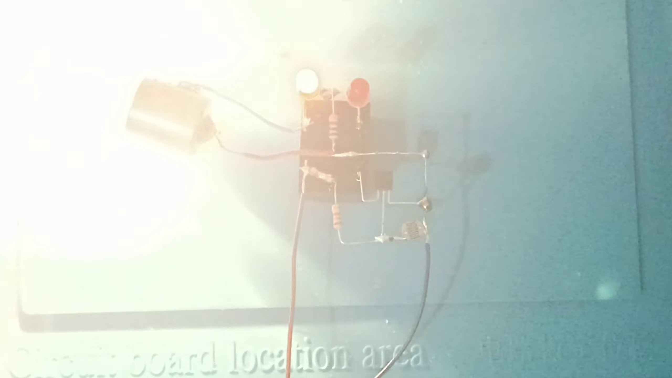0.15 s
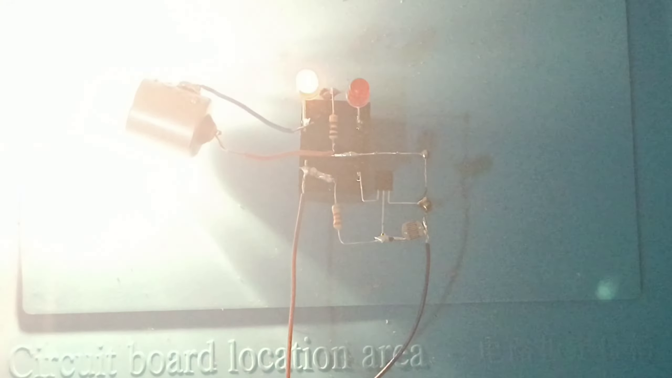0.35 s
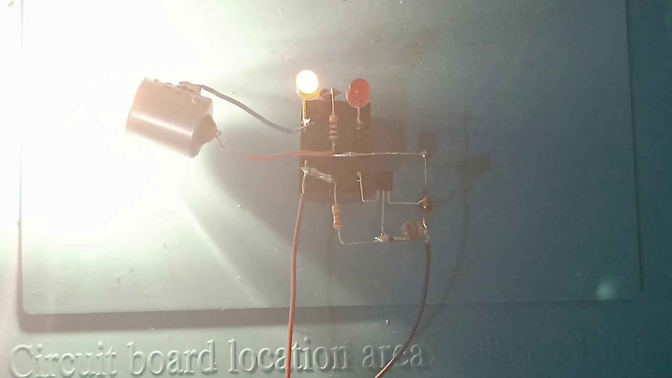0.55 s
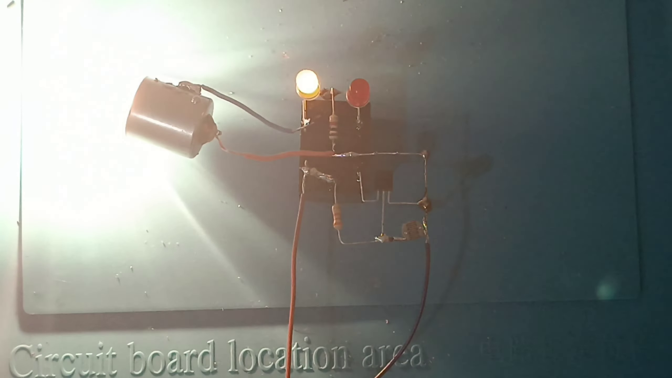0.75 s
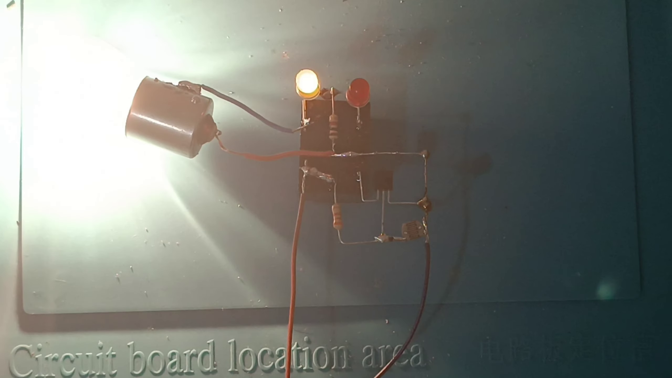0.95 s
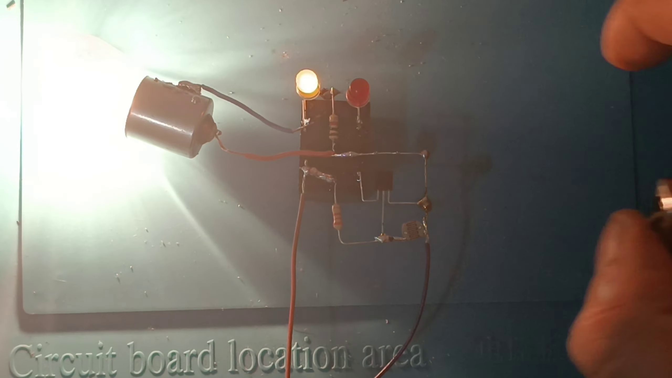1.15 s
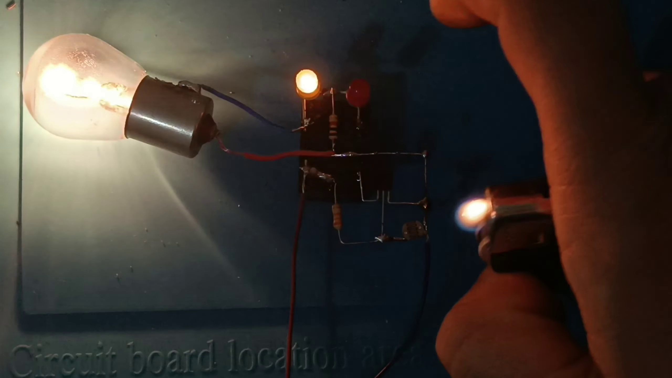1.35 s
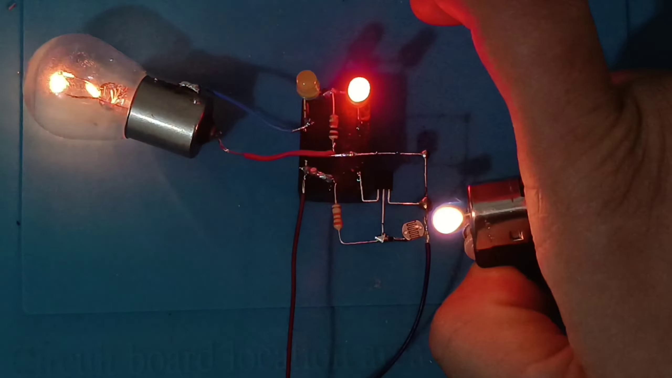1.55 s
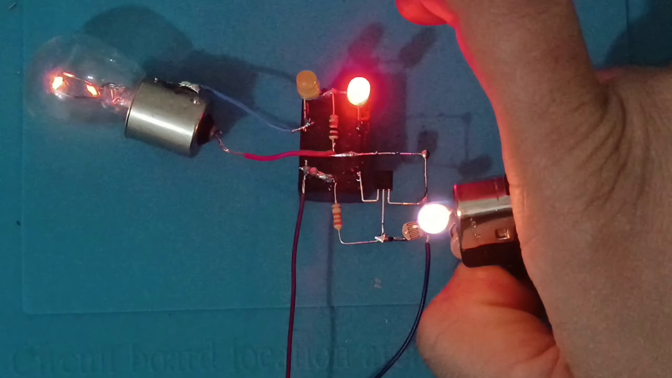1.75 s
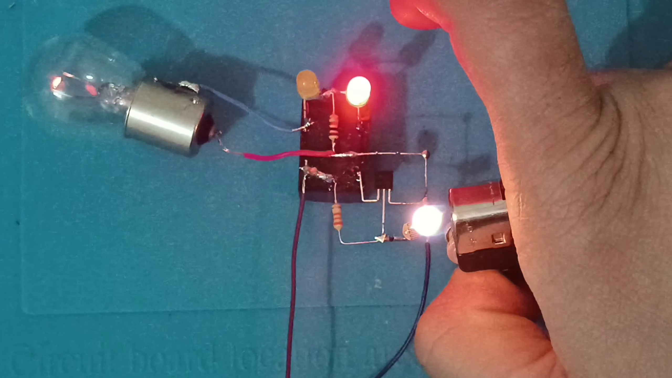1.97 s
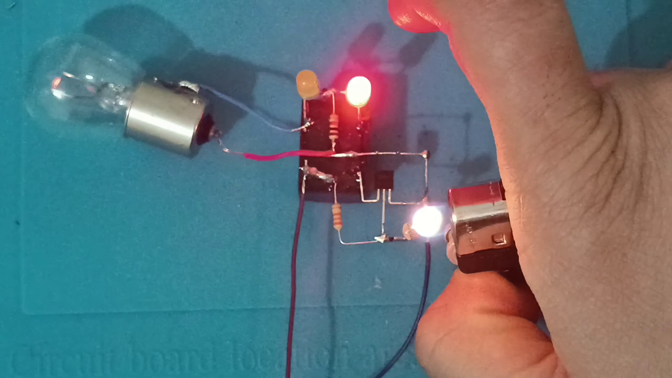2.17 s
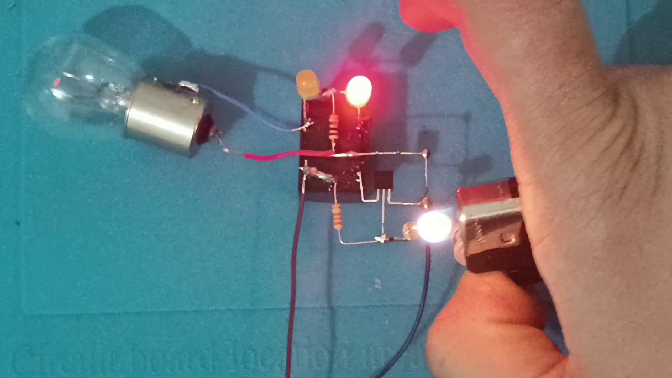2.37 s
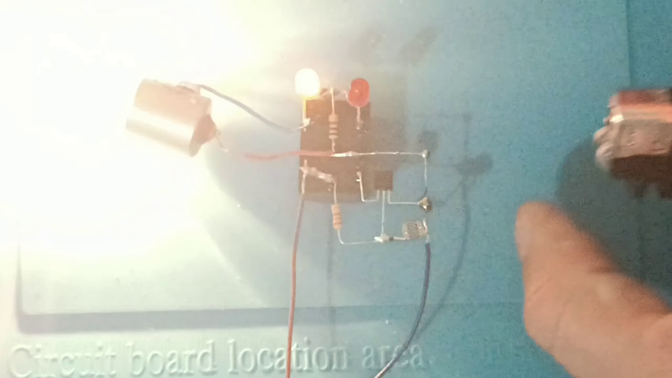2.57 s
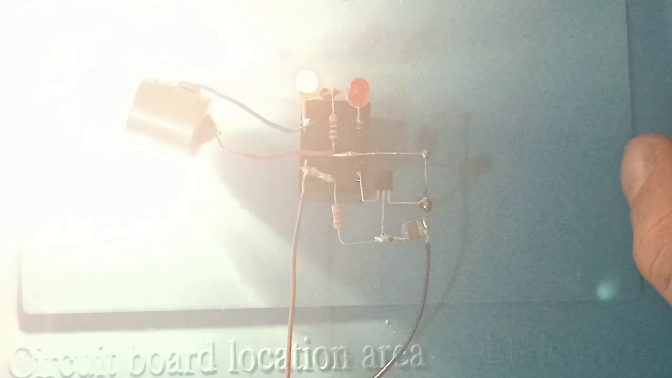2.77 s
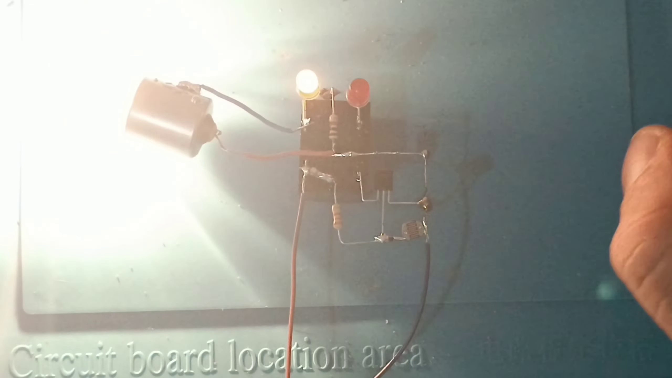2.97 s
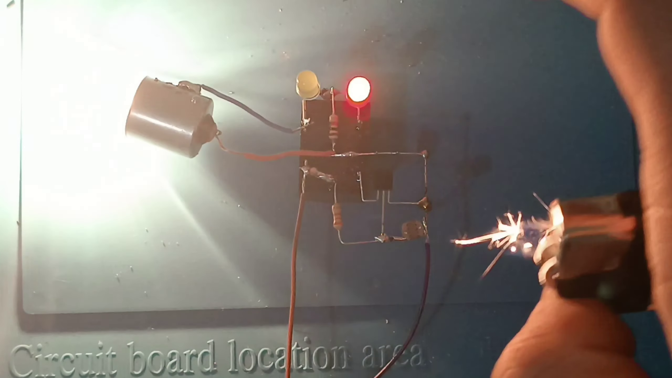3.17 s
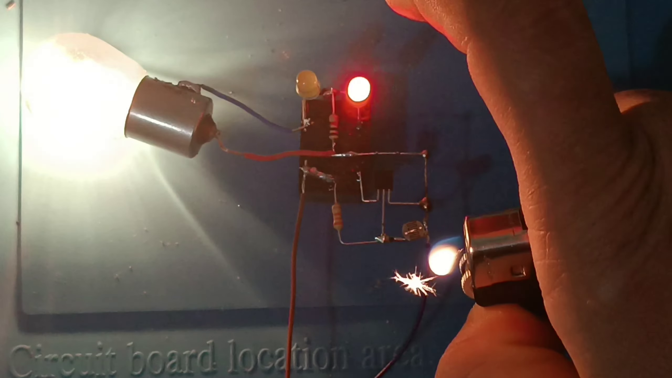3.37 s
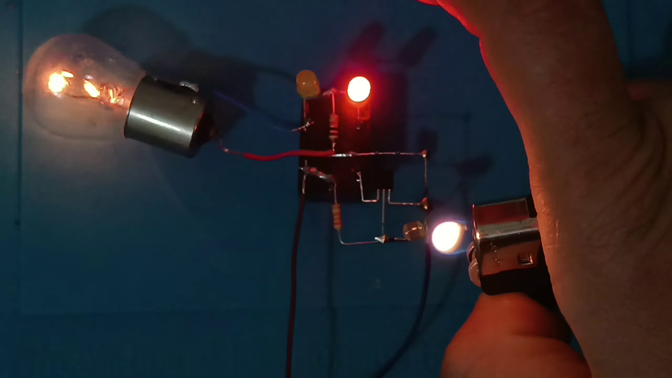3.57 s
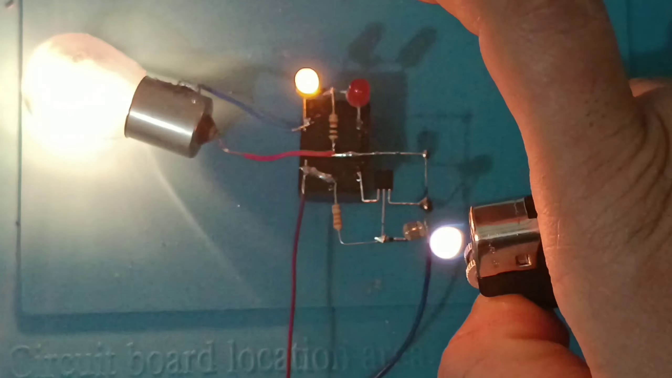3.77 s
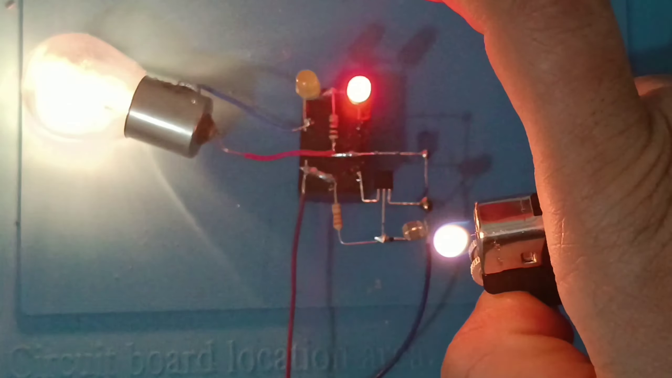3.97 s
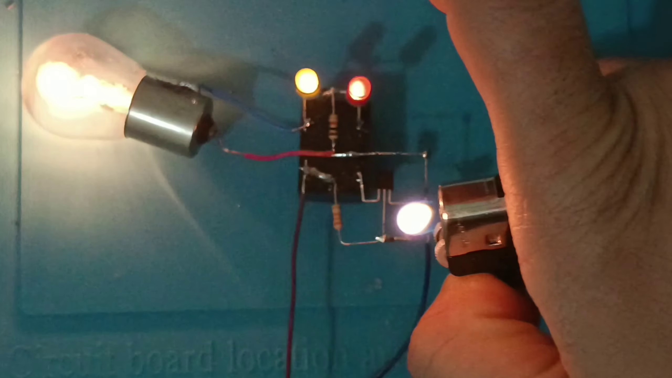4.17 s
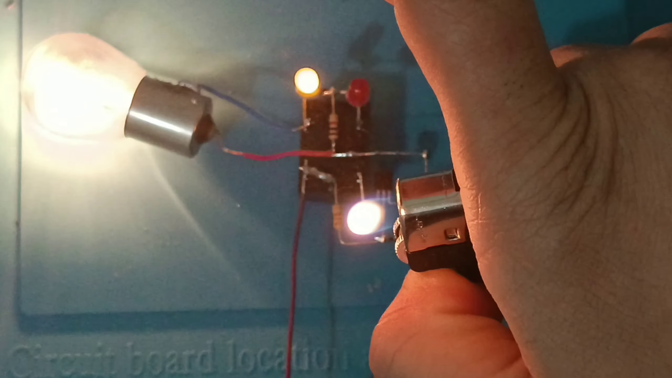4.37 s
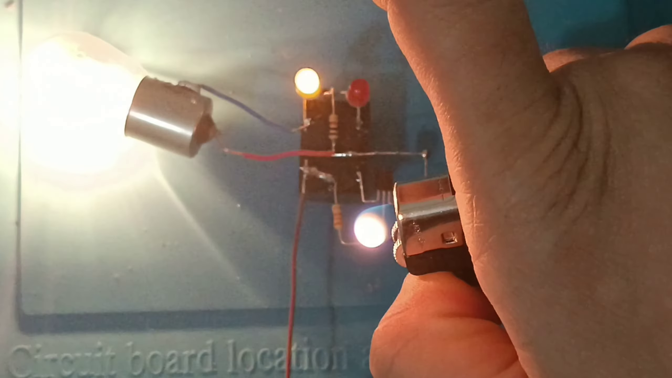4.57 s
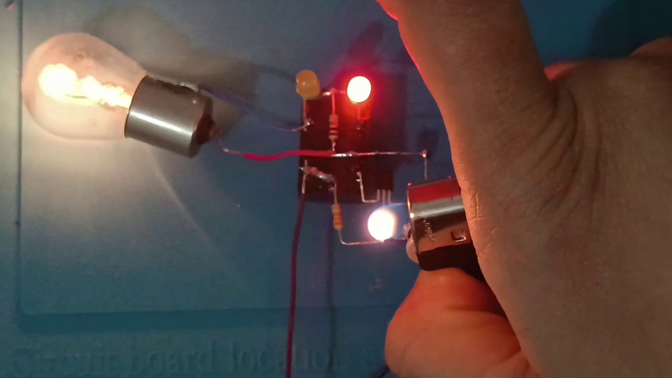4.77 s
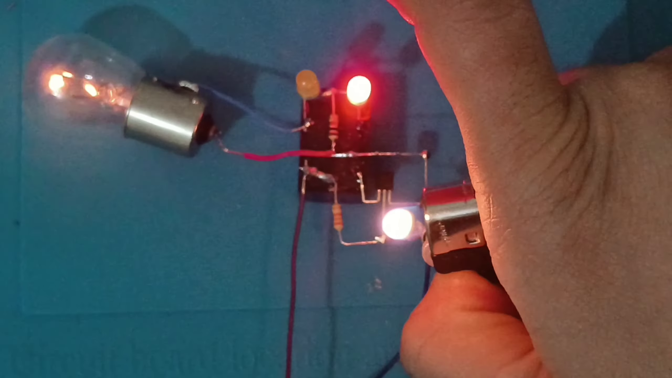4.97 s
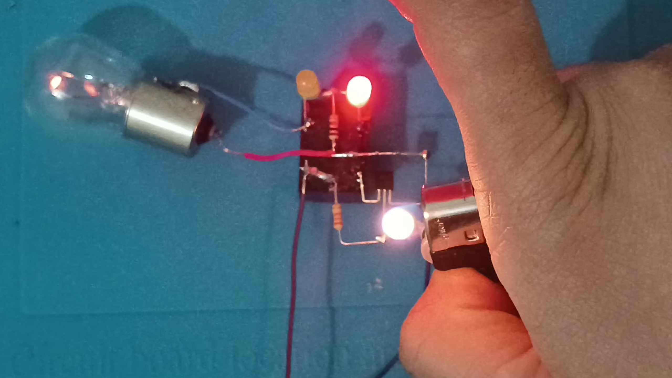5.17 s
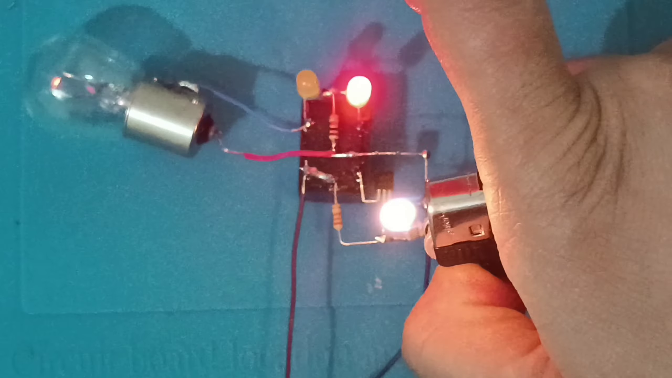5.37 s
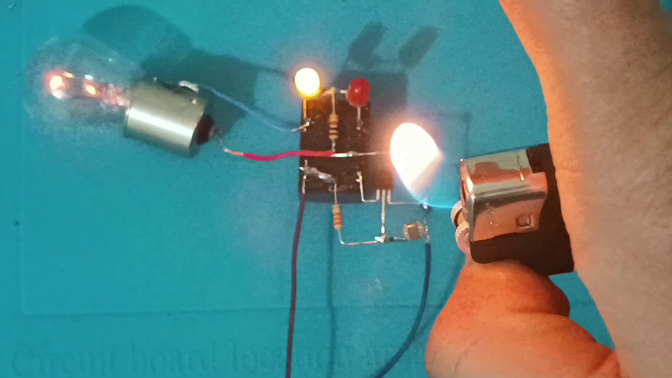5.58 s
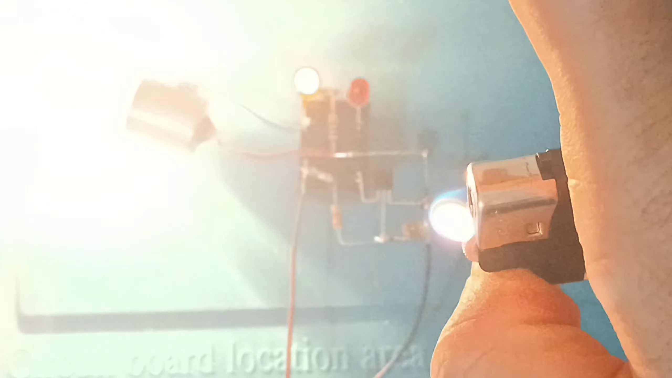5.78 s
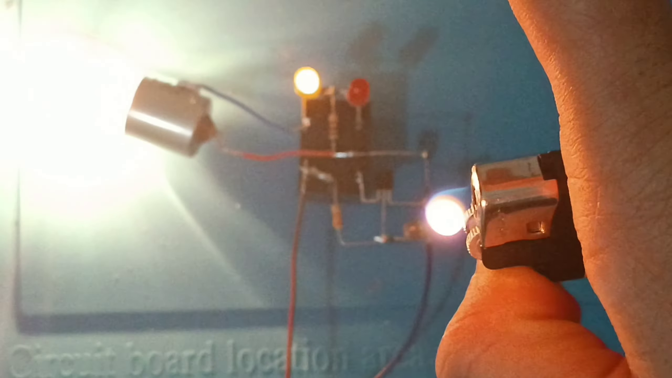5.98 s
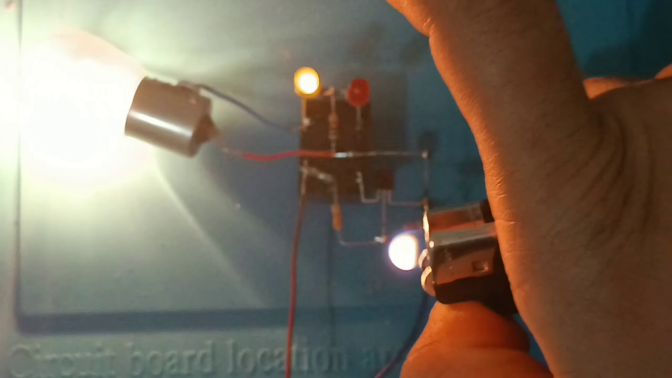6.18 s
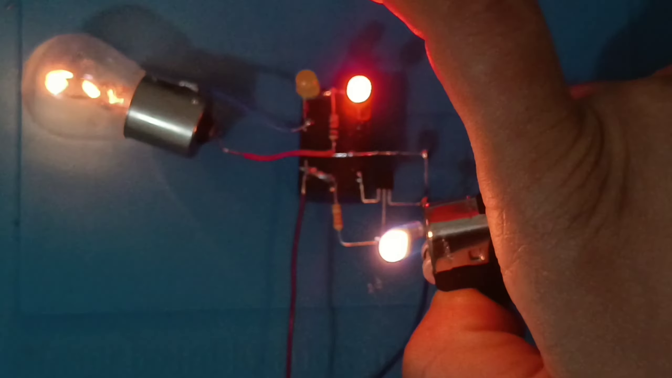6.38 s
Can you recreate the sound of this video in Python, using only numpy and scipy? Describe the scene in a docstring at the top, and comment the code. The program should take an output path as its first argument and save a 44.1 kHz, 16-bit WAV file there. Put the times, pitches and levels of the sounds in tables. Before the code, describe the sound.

A lighter scrapes and lights with soft pops while a small relay clicks singly, then chatters in buzzing bursts, close on a hobby desk.

```python
"""First a tiny squeak of a lighter's gas lever and the clack of a small relay, close by on a hobby desk.
The relay switches a lamp as the flame comes near a sensor: blows ring its armature and shake the desk, and
with the flame at the threshold the contact chatters in bursts. The lighter's wheel scrapes the flint in gritty
noise and the gas lights with low pressure pops. A small hard room answers in noise tails; a two-port microphone
above the desk hears more treble on the left. Behind lie rumble, rustle, hiss and a faint climbing tone."""
import sys
import numpy as np
from scipy import signal
from scipy.fft import rfft, irfft, next_fast_len
from scipy.io import wavfile

SR = 44100
rng = np.random.default_rng(int(sys.argv[2]) if len(sys.argv) > 2 else 0)


def voltage_ratio(level):
    """Linear amplitude factor for a level in decibels (scalar or array-like)."""
    return 10 ** (np.asarray(level, float) / 20)


def wav_record(signal):
    """Record a signal, one row per channel, as 16-bit PCM in the file named by sys.argv[1]."""
    frames = np.transpose(np.atleast_2d(signal))
    bounded = np.clip(frames, -1, 1)
    # unit amplitude maps onto the largest positive 16-bit level
    quanta = np.round(bounded * 32767).astype(np.int16)
    wavfile.write(sys.argv[1], SR, quanta)


N = 283563
T = np.arange(N) / SR
SIDE = np.array([[0.5], [-0.5]])  # each port takes half of a left-right difference

# desk top and low room resonances: (frequency [Hz], width [Hz], relative level [dB])
DESK = [(125, 5, -2), (161.6, 7.9, -2.5), (195.4, 4.9, -1.5), (209, 14, -5.5), (259.6, 13, -2),
        (290.6, 17, -2), (349.6, 26, -6), (374, 47.4, -5.5), (748, 160, -31.5)]


def unit(x):
    """Scales to rms 1."""
    return x / np.sqrt(np.mean(x ** 2) + 1e-20)


def along(points, hz):
    """Reads (frequency [Hz], value) points on a log frequency axis."""
    f, value = np.transpose(points)
    return np.interp(np.log(hz + 1), np.log(f + 1), value)


def filtered(x, response):
    """Multiplies the spectrum of x by a complex response of frequency."""
    m = 2 * next_fast_len(N // 2 + SR // 2)
    return irfft(rfft(x, m) * response(np.fft.rfftfreq(m, 1 / SR)), m)[..., :N]


def causal(spectrum):
    """Minimum-phase response of energy 1 with this colour: the sound starts at once and nothing precedes it."""
    def response(hz):
        cepstrum = irfft(np.log(voltage_ratio(along(spectrum, hz)) + 1e-6))
        cepstrum[1:len(hz) - 1] *= 2  # fold the backward half onto the forward half
        cepstrum[len(hz):] = 0
        log_response = rfft(cepstrum)
        return unit(np.abs(np.exp(log_response))) * np.exp(1j * log_response.imag)
    return response


def modes(table):
    """Response of energy 1 of a set of damped resonances, with alternating signs."""
    def response(hz):
        total = 0
        for k, (center, width, db) in enumerate(table):
            damping = 1j * hz * width
            total = total + (-1) ** k * voltage_ratio(db) * damping / (center * center - hz * hz + damping)
        return total / np.sqrt(np.mean(np.abs(total) ** 2))
    return response


def rattled(onsets, t60):
    """Every impulse becomes a short dying rattle of fresh noise."""
    return signal.fftconvolve(onsets, voltage_ratio(-60 * T[:SR // 20] / t60))[:N] * rng.standard_normal(N)


def stamped(onsets, t60):
    """Every impulse repeats the same short rattle."""
    t = T[:SR // 50]
    shape = voltage_ratio(-60 * t / t60) * np.sign(rng.standard_normal(len(t)))
    return signal.fftconvolve(onsets, shape)[:N]


def tail(t60, size):
    """Two unrelated noise tails of energy 1; each frequency dies at its own speed."""
    length = SR * 2 // 3
    hz, t, z = signal.stft(rng.standard_normal((2, length)), SR, nperseg=size)
    dying = z * voltage_ratio(-60 * t / t60(hz)[:, None])
    out = signal.istft(dying, SR, nperseg=size)[1][:, :length]
    return out / np.linalg.norm(out, axis=1, keepdims=True)


def heard(x, lag_s, desk_db, room_db, alike=0, gap_s=0.007):
    """Direct sound (left leads by lag_s), scatter off the desk clutter and, gap_s later, the room at both ports;
    alike = share of echo common to both."""
    # near sources: (frequency [Hz], left over right [dB])
    ports = [(60, -3), (110, 0), (200, 1), (380, -2), (700, -1.5), (1290, -3), (2380, -0.5), (4400, -8),
             (8120, -1), (15000, 23)]
    # decay of the small room: (frequency [Hz], t60 [s])
    room = [(120, 0.84), (190, 0.45), (300, 0.24), (600, 0.53), (2000, 0.43), (6000, 0.32), (15000, 0.18)]
    # colour of the echoes, strongest around 7 kHz: (frequency [Hz], level [dB])
    echo_colour = [(500, 5), (3000, 6.5), (7000, 7.5), (14000, 6)]
    echo = voltage_ratio(desk_db) * tail(lambda hz: 0.048 + 0 * hz, size=128)
    gap = round(gap_s * SR)
    echo[:, gap:] += voltage_ratio(room_db) * tail(lambda hz: along(room, hz), size=512)[:, :-gap]
    echo[1] = alike * echo[0] + np.sqrt(1 - alike ** 2) * echo[1]
    coloured = filtered(x, lambda hz: voltage_ratio(along(echo_colour, hz)))
    around = signal.fftconvolve(coloured[None], echo, axes=1)[:, :N]
    # echoes come from all sides, so the ports differ less
    around = filtered(around, lambda hz: voltage_ratio(0.45 * SIDE * along(ports, hz)))
    direct = filtered(x, lambda hz: voltage_ratio(SIDE * along(ports, hz)) * np.exp(2j * np.pi * SIDE * hz * lag_s))
    return direct + around


def quiet_noise(spectrum, alike):
    """Coloured background noise at both ports, rms 1 in their mean; alike = share common to both."""
    # background: (frequency [Hz], left over right [dB])
    quiet_ports = [(60, 3), (240, 2), (950, 1.5), (3770, 0), (15000, 0.5)]
    a, b = rng.standard_normal((2, N))
    pair = np.array([a, alike * a + np.sqrt(1 - alike ** 2) * b])
    pair = filtered(pair, lambda hz: voltage_ratio(along(spectrum, hz) + SIDE * along(quiet_ports, hz)))
    return pair / np.sqrt(np.mean(pair.mean(axis=0) ** 2))


def faint_tone():
    """A faint sine swells, climbs slowly in pitch and dies away."""
    start_s, level_db, rise_s, t60_s = 2.62, -66, 0.03, 2.5
    start_hz, climb_hz_per_s = 589, 10
    t = np.maximum(T - start_s, 0)
    swell = (1 - np.exp(-t / rise_s)) ** 2
    sine = np.sin(2 * np.pi * (start_hz + climb_hz_per_s * t / 2) * t)
    return voltage_ratio(level_db - 60 * t / t60_s) * swell * sine


def hand():
    """Hand and arm moving on the desk: low rumble, and a rustle that follows its level less steeply."""
    # rumble of the moving hand, before the brushes: (time [s], level [dB])
    moves = [(0.0, -59.5), (0.21, -66.5), (0.61, -63.5), (0.91, -66.5), (1.25, -65.5), (1.48, -58.5),
             (1.79, -66), (2.4, -67), (2.56, -62), (2.96, -66.5), (3.42, -63.5), (3.71, -63), (4.73, -62.5),
             (4.99, -65), (5.32, -68), (6.03, -64), (6.43, -61.5)]
    # brief hand moves: (time [s], length [s], swell [dB])
    brushes = [(0.39, 0.089, 5), (0.502, .12, 6), (0.707, 0.033, 6), (1.044, 0.034, 3.5)]
    # colour of the rumble: (frequency [Hz], relative density [dB])
    rumble_colour = [(13, -63.5), (22, -27), (59, -4.5), (96, -2), (183, -4), (214, -6), (267, -9),
                     (304, -6.5), (500, -19.5), (650, -56), (1100, -120)]
    # colour of the rustle: (frequency [Hz], relative density [dB])
    rustle_colour = [(240, -33.5), (400, -8.5), (551, -2.5), (600, -3.5), (937, -6), (3000, -11),
                     (3900, -35.5), (6600, -120)]
    hand_db = np.interp(T, *np.transpose(moves))
    for s, length, swell_db in brushes:
        hand_db += swell_db * np.sin(np.pi * np.clip((T - s) / length, 0, 1))
    rumble = voltage_ratio(hand_db) * quiet_noise(rumble_colour, alike=0.3)
    rustle_db = -72 + 0.48 * (hand_db - hand_db.mean())  # 0.48 dB of rustle for each dB of hand
    return rumble + voltage_ratio(rustle_db) * quiet_noise(rustle_colour, alike=0.03)


def background():
    """Hand noise, steady microphone hiss nearly unrelated between the ports, and the faint tone."""
    # colour of the hiss: (frequency [Hz], relative density [dB])
    hiss_colour = [(880, -15.5), (1500, -4), (1670, -3.5), (1830, -3), (2140, -8.5), (3360, -5.5),
                   (6360, -13.5), (9800, -20.5), (14900, -15.5), (15700, -19)]
    return hand() + voltage_ratio(-77) * quiet_noise(hiss_colour, alike=0.01) + faint_tone()


def wheel():
    """Pressure of the wheel on the flint: it winds up to a peak, eases toward a drag and stops."""
    # wheel on flint: (peak time [s], peak level [dB], drag level [dB], time from peak to stop [s])
    strikes = [(1.3194, -38.5, -48, 0.051), (3.263, -34, -58, 0.022)]
    wind_up_db_per_s, ease_db_per_s, stop_db_per_s = 1246.5, 896, 1917
    out = np.zeros(N)
    for s, peak_db, drag_db, length in strikes:
        t = T - s
        eased_db = np.maximum(peak_db - ease_db_per_s * t, drag_db)
        eased_db -= stop_db_per_s * np.maximum(t - length, 0)
        out += voltage_ratio(np.where(t < 0, peak_db + wind_up_db_per_s * t, eased_db))
    return out


def grit(per_second, spread_db, t60):
    """A dense random train of tiny impacts of uneven strength, rms 1."""
    impacts = (rng.random(N) < per_second / SR) * voltage_ratio(spread_db * rng.standard_normal(N))
    return unit(rattled(impacts, t60))


def lever_and_rustle():
    """Lever squeaks, and at 1.05 s a faint hand rustle: short narrow noises around one pitch, gated on and off."""
    # lever squeaks and one hand rustle: (time [s], length [s], frequency [Hz], level [dB])
    narrow_noises = [(.006, 0.0033, 3100, -54), (0.026, 0.0051, 3270, -56.5), (1.05, .05, 1800, -73),
                     (2.491, 0.039, 3220, -60)]
    out = np.zeros(N)
    for s, length, hz, db in narrow_noises:
        gate = np.sin(np.pi * np.clip((T - s) / length, 0, 1)) ** 0.24
        narrow = unit(filtered(rng.standard_normal(N), modes([(hz, 0.15 * hz, 0)])))
        out += voltage_ratio(db) * gate * narrow
    return out


def ignition():
    """The gas lights with pressure pops: each is a dip, then a push, under a bell-shaped envelope."""
    # pops, twice a strike: (time [s], drive [dB])
    pops = [(1.359, -16.5), (1.3646, -23), (3.291, -24.5), (3.298, -32.5)]
    pop_hz, pop_s = 218, 0.0012  # pitch and half length
    out = np.zeros(N)
    for s, db in pops:
        t = T - s
        out += voltage_ratio(db) * np.sin(2 * np.pi * pop_hz * t) * np.exp(-(t / pop_s) ** 2 / 2)
    return out


def lighter():
    """Gritty scrape and bites of wheel on flint, lever squeaks and a hand rustle, low thump of the gas catching."""
    # a tooth of the wheel bites: (time [s], drive [dB])
    cracks = [(1.3241, -19), (1.3325, -27), (3.2598, -25), (3.262, -27), (3.274, -31), (3.2955, -34)]
    # colour of the flint: (frequency [Hz], relative density [dB])
    flint = [(88, -46.5), (150, -14), (360, -5), (491, -9.5), (683, -2), (1200, -11), (1430, -9),
             (2460, -3.5), (2770, -7.5), (3170, 0), (4770, -12.5), (5680, -6), (9230, -11), (14200, -10),
             (15600, -19)]
    scrape = wheel() * grit(per_second=3100, spread_db=7.5, t60=0.0023)
    bites = np.zeros(N)
    for s, db in cracks:
        bites[round(s * SR)] = voltage_ratio(db)
    bright = filtered(scrape + rattled(bites, t60=0.0098), causal(flint)) + lever_and_rustle()
    # each bite jolts the hand
    thump = ignition() + voltage_ratio(-28) * filtered(bites, modes([(247, 450, 0)]))
    boom = thump + voltage_ratio(-29) * filtered(thump, modes(DESK))
    return (heard(bright, lag_s=0.00004, desk_db=-3, room_db=-9)
            + heard(boom, lag_s=0.00007, desk_db=-20, room_db=-11, alike=0.87, gap_s=0.018))


def blows():
    """Single contact blows: each is one dying rattle, driving the contact and, at its own level, the armature."""
    # blows: (time [s], contact drive [dB], armature drive re contact [dB])
    hits = [(0.047, -40, -28), (0.0508, -37, -15), (0.056, -32.5, -15), (0.0653, -49, -5),
            (1.393, -38, -23), (1.4516, -42.5, -22), (1.4988, -48, -4.5), (2.5406, -44, -14),
            (2.5432, -42.5, -2.5), (2.5504, -34, -19), (3.3544, -51, -1.5), (3.3592, -27.5, -12.5),
            (3.4521, -32.5, -1), (3.4567, -38, 2.5), (5.686, -51, 10.5), (5.7237, -37.5, -12),
            (5.9711, -37, -1.5), (5.9753, -42.5, 8)]
    t = T[:SR // 20]
    contact, armature = np.zeros((2, N + SR))
    rattle = rng.standard_normal((len(hits), len(t)))
    for (s, db, ring_db), noise in zip(hits, rattle):
        blow = voltage_ratio(db - 60 * t / 0.0029) * noise  # t60 2.9 ms
        span = slice(round(s * SR), round(s * SR) + len(blow))
        contact[span] += blow
        armature[span] += voltage_ratio(ring_db) * blow
    return contact[:N], armature[:N]


def chatter(gap_s, jitter, spread_db):
    """The contact opens and closes at a nearly even pace: impulses for the contact, and for the body."""
    # bursts, before the spread: (time [s], length [s], first tick [dB], last tick [dB], body jolt re tick [dB])
    bursts = [(3.683, 0.075, -41.5, -37.5, -3), (3.802, .011, -45.5, -46, -1),
              (3.863, 0.0092, -43, -46, -2), (3.891, 0.015, -70, -51, 1.5), (3.948, 0.01, -42.5, -44, -1.5),
              (3.976, .018, -47, -47, 1.5), (4.024, 0.01005, -40, -43, -3.5), (4.046, .005, -63, -43, -15),
              (4.109, 0.064, -46, -46.5, -0.5), (4.174, 0.031, -44.5, -57.5, 1),
              (4.215, 0.0068, -47, -66, -3), (4.275, .092, -47.5, -48, -0.5),
              (4.381, 0.022, -49, -44.5, 1.5), (4.443, 0.076, -47, -42, -2), (4.509, 0.048, -51, -46, 1),
              (4.601, 0.068, -50.5, -44, -0.5), (4.689, .096, -49, -47.5, 0),
              (4.793, 0.083, -45.5, -50.5, 1.5), (5.677, .04, -42.5, -48, 3),
              (6.021, 0.0065, -41.5, -37, -2.5), (6.062, 0.041, -49, -39.5, -4.5),
              (6.135, 0.044, -45, -42.5, -4.5), (6.209, .027, -46, -48, -0.5), (6.236, .13, -44, -42.5, -4)]
    onsets = np.zeros((2, N))
    chance = rng.standard_normal((len(bursts), 2, 48))
    for (s, length, first_db, last_db, jolt_db), (pace, size) in zip(bursts, chance):
        after = np.append(0, np.cumsum(gap_s * np.exp(jitter * pace[1:])))
        on = after <= length
        tick_db = first_db + (last_db - first_db) * after / length
        db = np.array([tick_db, tick_db + jolt_db]) + spread_db * size
        onsets[:, np.round((s + after[on]) * SR).astype(int)] = voltage_ratio(db[:, on])
    return onsets


def relay():
    """Each blow and chatter tick sounds at the contact, rings the armature and shakes the desk."""
    # contact tick: (frequency [Hz], relative density [dB])
    contact_colour = [(3000, -32), (5000, -9), (6200, -4), (7400, -8), (8700, -16), (10200, -5),
                      (11700, -11), (14000, 1), (15600, -3)]
    # relay armature and case: (frequency [Hz], relative density [dB])
    armature_colour = [(410, -44), (700, -14), (880, -14), (993, -10), (1790, -18), (2400, -1), (2920, -4),
                       (3300, -3), (4100, -10), (4830, -10), (5630, -1), (6770, -7), (7470, -6),
                       (8430, -17), (9500, -11), (12400, -41), (20900, -120)]
    # case resonances, rung by the single blows only: (frequency [Hz], width [Hz], relative level [dB])
    case = [(2450, 300, -4), (5520, 380, 0)]
    contact, armature = blows()
    ticks, jolts = chatter(gap_s=0.0044, jitter=0.18, spread_db=1)
    # chatter ticks are partly alike, partly each different
    chattering = 0.85 * stamped(ticks, t60=0.0025) + 0.5 * rattled(ticks, t60=0.0025)
    tick = filtered(contact + chattering, causal(contact_colour))
    tick = heard(tick, lag_s=0.000083, desk_db=-2.5, room_db=-6.5)
    ring = filtered(armature + voltage_ratio(-7) * rattled(jolts, t60=0.0071), causal(armature_colour))
    ring += voltage_ratio(-1) * filtered(armature, modes(case))
    shake = filtered(voltage_ratio(-7) * rattled(jolts, t60=0.0049) + voltage_ratio(-5) * armature, modes(DESK))
    return (tick + heard(ring, lag_s=0.0001, desk_db=1, room_db=-2)
            + heard(shake, lag_s=0, desk_db=-4.5, room_db=-1, alike=0.65))


def scene():
    """All sources at the two ports; the capsule drops the deepest bass and the top treble of the near sounds."""
    # microphone, near sounds: (frequency [Hz], level [dB])
    mic = [(20, -40), (60, -16), (120, -3), (200, 0), (15400, 0), (15800, -30), (17000, -50)]
    near = relay() + lighter()
    return filtered(near, lambda hz: voltage_ratio(along(mic, hz))) + background()


def top_cut(x):
    """Nothing passes above the cut-off."""
    return signal.sosfilt(signal.butter(12, 16630, fs=SR, output="sos"), x)


def record(dry):
    """The finished two-port mix as the recorder stores it."""
    return top_cut(dry)


dry = scene()
out = record(dry)
wav_record(out)
```